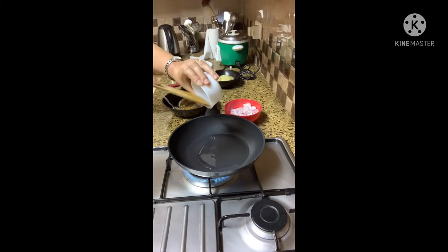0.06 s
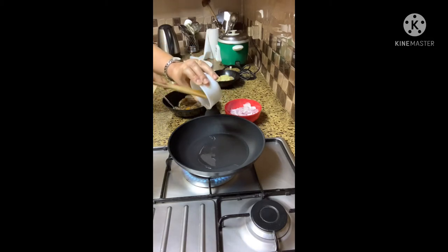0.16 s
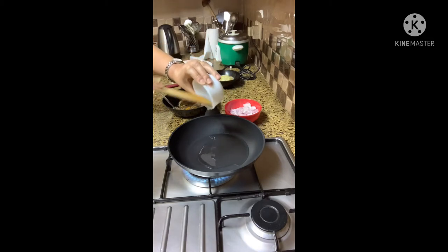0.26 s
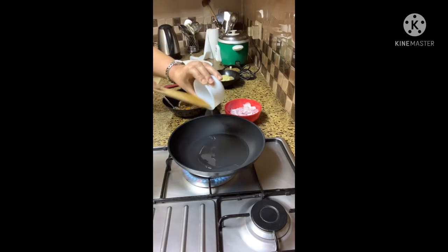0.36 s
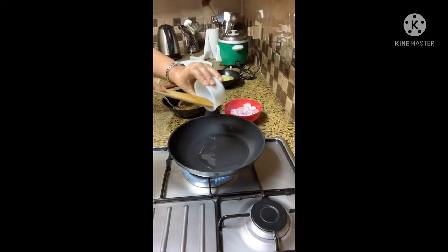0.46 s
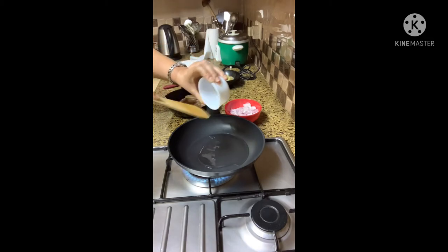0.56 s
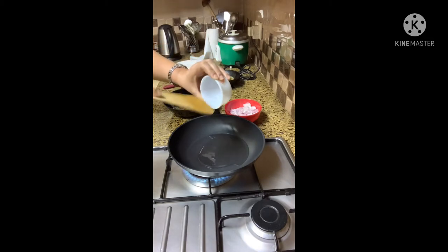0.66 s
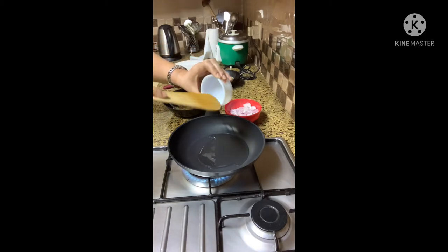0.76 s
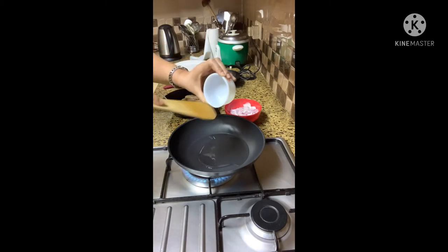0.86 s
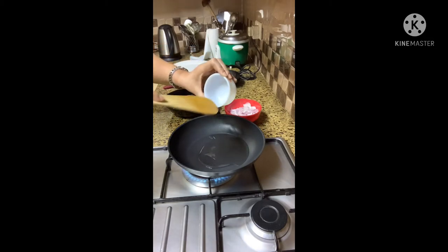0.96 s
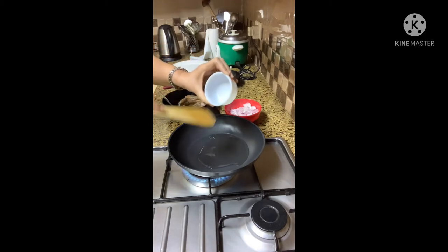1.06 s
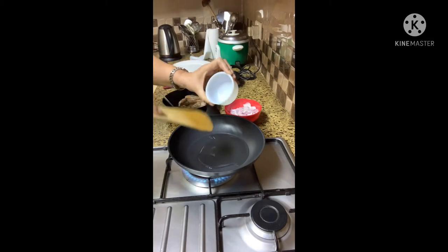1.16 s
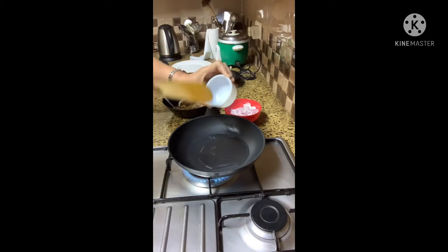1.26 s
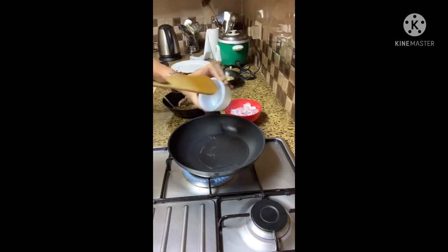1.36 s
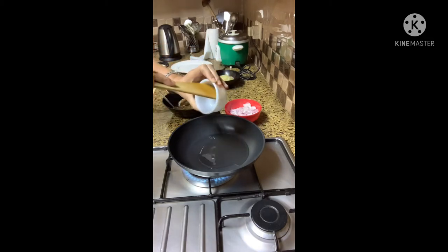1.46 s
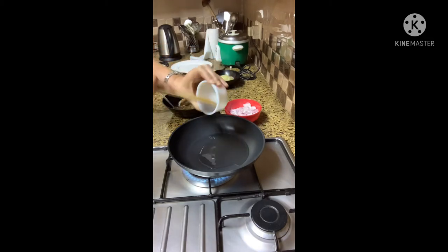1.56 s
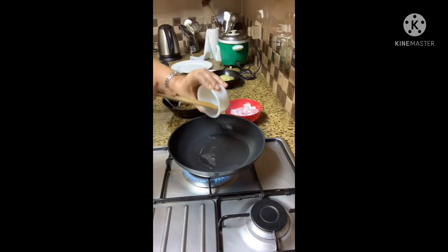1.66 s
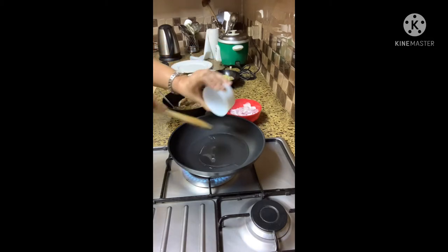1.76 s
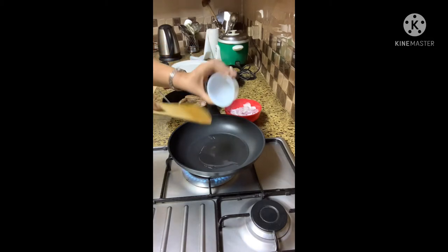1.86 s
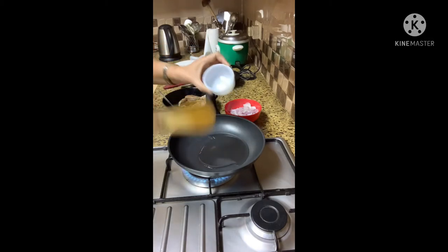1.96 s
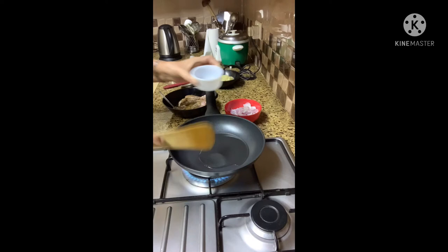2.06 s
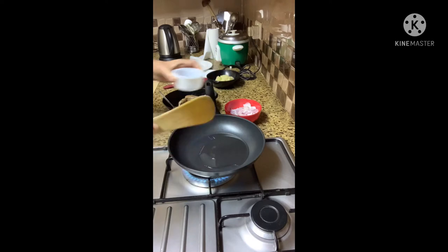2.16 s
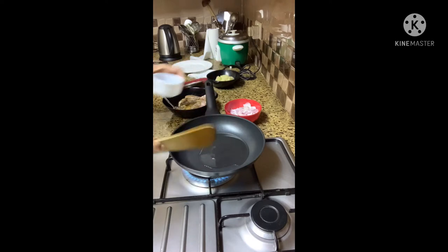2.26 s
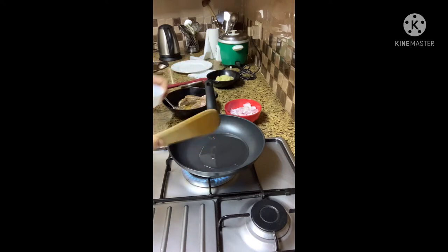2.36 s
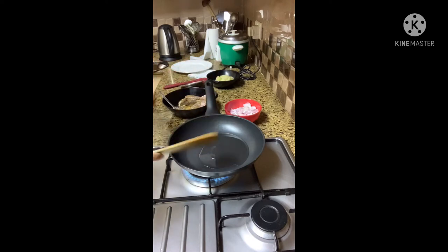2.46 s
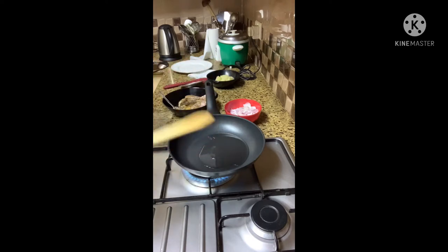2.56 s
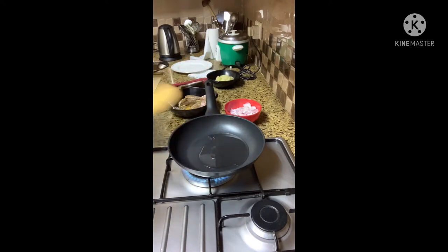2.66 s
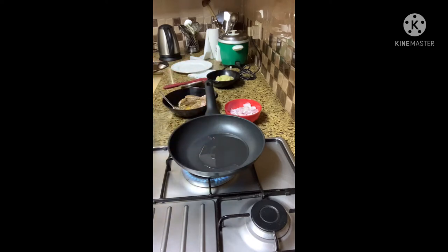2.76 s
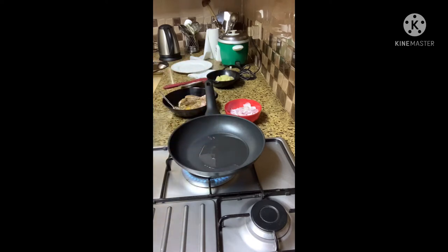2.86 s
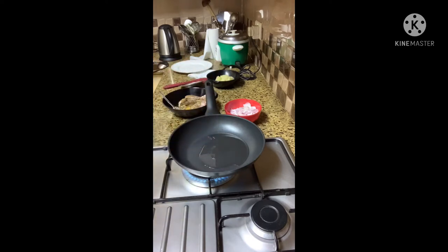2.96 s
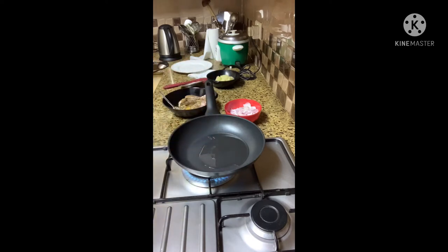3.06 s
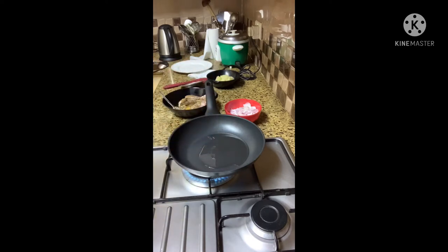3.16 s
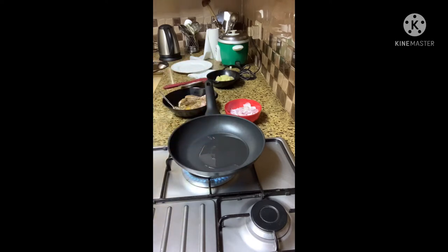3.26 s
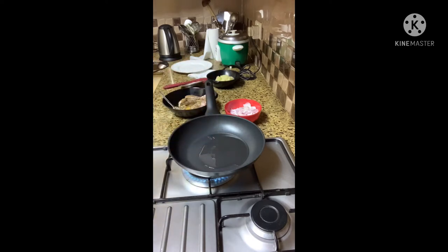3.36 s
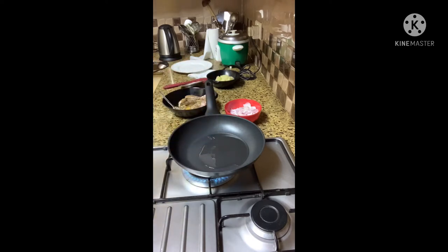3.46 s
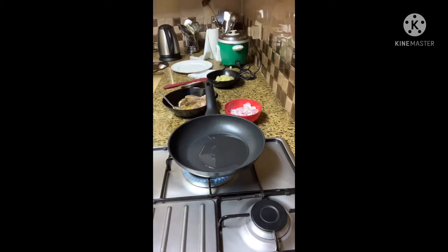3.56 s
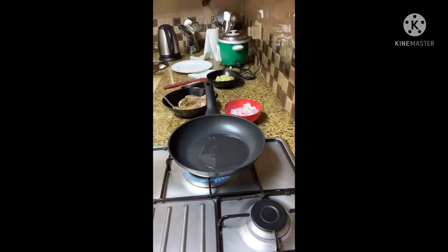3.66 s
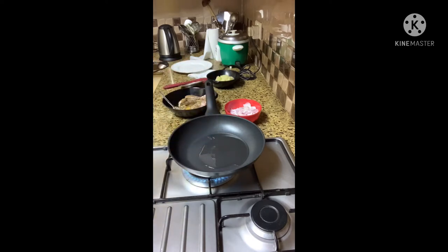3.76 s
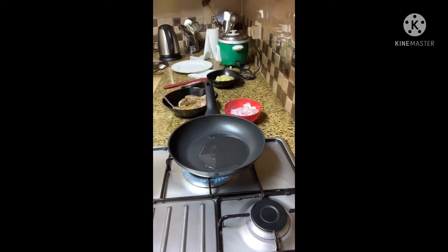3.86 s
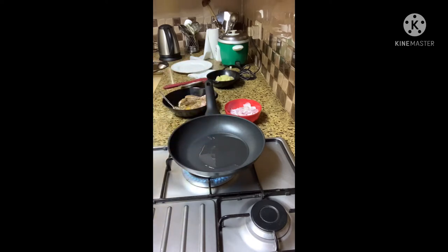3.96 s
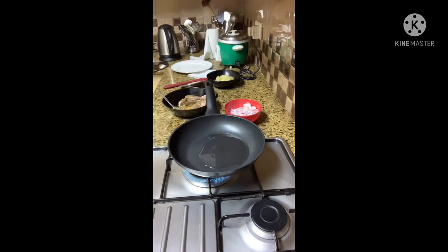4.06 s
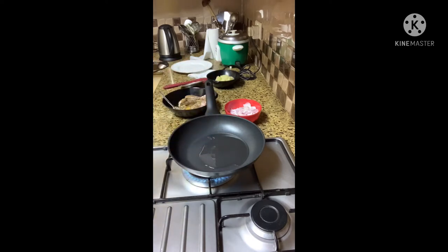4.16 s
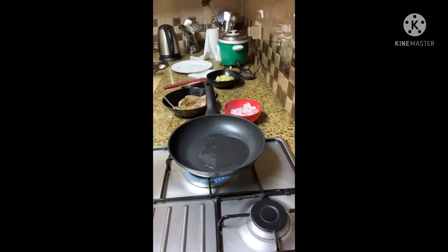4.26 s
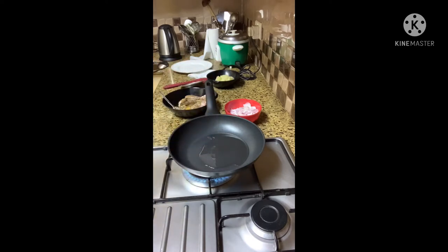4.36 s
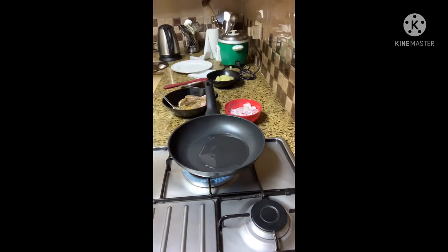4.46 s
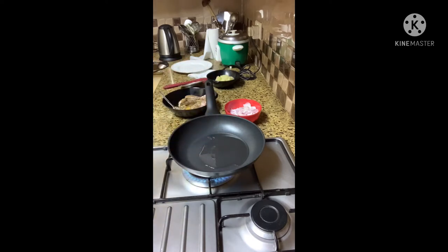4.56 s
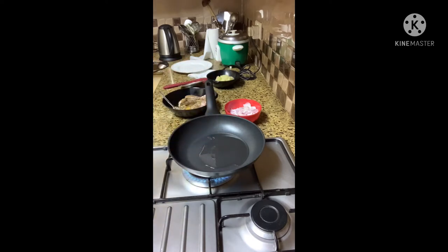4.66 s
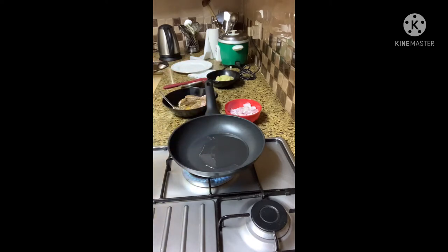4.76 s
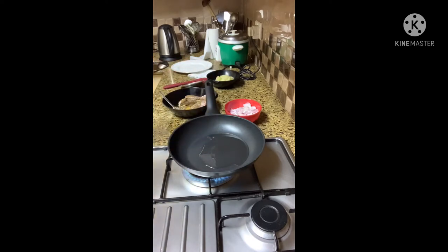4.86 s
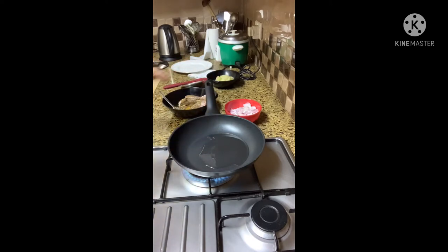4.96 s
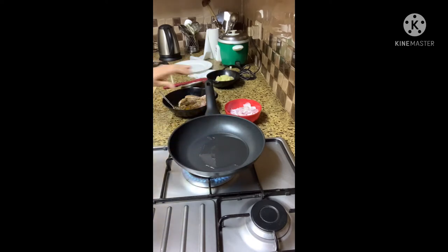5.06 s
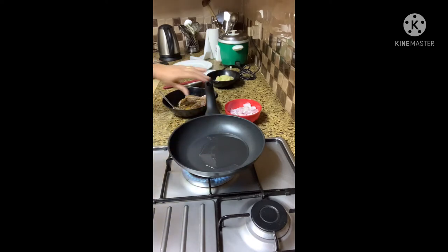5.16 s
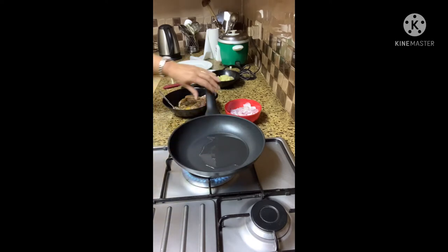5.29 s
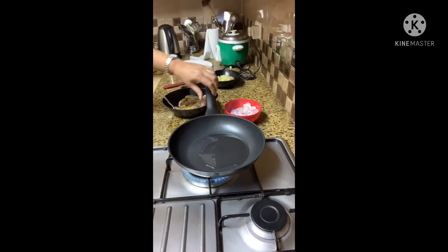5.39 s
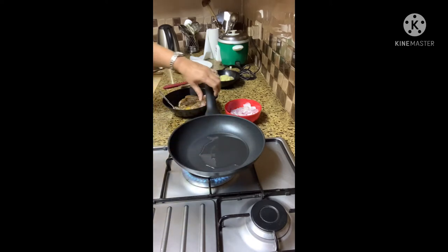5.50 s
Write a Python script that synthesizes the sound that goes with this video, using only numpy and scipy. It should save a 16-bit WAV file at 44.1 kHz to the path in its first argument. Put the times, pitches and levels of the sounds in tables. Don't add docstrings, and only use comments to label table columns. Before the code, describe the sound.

In a tiled kitchen a gas burner hisses faintly over a low mains hum. Close by, a wooden spatula taps a hand-held bowl in two clusters, with short gritty scrapes between. After soft cloth and slipper rustles, the bowl is set down farther away with a reverberant thud, then faint knocks follow. Phone microphone, limited deep bass.

```python
import sys
import numpy as np
from scipy import signal
from scipy.fft import rfft, irfft
from scipy.io import wavfile
from scipy.ndimage import uniform_filter1d

SR = 44100
rng = np.random.default_rng(int(sys.argv[2]) if len(sys.argv) > 2 else 0)


def volts(x):
    e = np.asarray(x, float) / 20
    return 10 ** e


def int16_out(signal):
    q = np.round(np.clip(np.atleast_2d(signal).T, -1, 1) * 32767)
    wavfile.write(sys.argv[1], SR, q.astype(np.int16))


N = 243873


def level(x, db):
    return x * volts(db) / np.sqrt(np.mean(x ** 2))


def band(x, hz, width):
    return signal.lfilter(*signal.iirpeak(hz, hz / width, fs=SR), x)


def walk(rate):
    k = int(SR / rate)
    steps = np.repeat(rng.standard_normal(N // k + 1), k)
    return 1.4 * uniform_filter1d(uniform_filter1d(steps, k), k)[:N]


def add(track, s, x):
    i = int(s * SR)
    track[i:i + len(x)] += x[:N - i]


def recolour(y, hz, db):
    spectrum = rfft(y)
    f = np.fft.rfftfreq(len(y), 1 / SR) + 1
    broad = np.sqrt(uniform_filter1d(np.abs(spectrum) ** 2, size=len(y) // 150))
    colour = volts(np.interp(np.log(f), np.log(hz), db))
    return irfft(spectrum / broad * colour, len(y))


def ring(modes, rise_s, scatter_db):
    t = np.arange(SR // 3) / SR
    hz, db, t60 = np.transpose(modes)[:, :, None]
    luck_db = scatter_db * rng.standard_normal((len(modes), 1))
    y = np.sum(volts(db + luck_db) * np.sin(2 * np.pi * hz * t) * 1000. ** (-t / t60), axis=0)
    y = y * (1 - np.exp(-t / rise_s)) ** 2
    return y / np.abs(y).max()


def burst(colour, t60, tilt_db):
    t = np.arange(8192) / SR
    hz, db = np.transpose(colour)
    noise = rng.standard_normal(len(t)) * 1000. ** (-t / t60)
    y = recolour(noise, hz, db + tilt_db * np.log2(hz / 1500))
    y = y * np.clip(t / 0.00038, 0, 1) * (t < .15)
    return y / np.abs(y).max()


# pitch_hz, density_db (per Hz)
HISS = [(18, -68), (30, -14.5), (64, -10), (100, -2), (170, -8.5), (311, -17.5), (394, -17.5), (449, -20),
        (740, -14.5), (1390, -26), (1670, -27), (4190, -30), (8080, -35), (13700, -33), (16000, -38.5)]
# pitch_hz, width_hz, level_db
JETS = [(140, 9.9, -63.5), (753.4, 50, -64), (601, 40, -71), (399, 30, -74), (4140, 70, -88.5),
        (9570, 150, -74), (10500, 80, -88), (11580, 130, -75.5), (13300, 200, -80.5), (14200, 90, -76)]
# pitch_hz, level_db
HUM = [(50, -71), (100, -56.5), (199, -75)]


def burner():
    f = np.fft.rfftfreq(N, 1 / SR) + 1
    t = np.arange(N) / SR
    hz, db = np.transpose(HISS)
    colour = volts(np.interp(np.log(f), np.log(hz), db))
    scale = np.sqrt(np.sum(colour[f > 1000] ** 2) * 2 / N)
    hiss_db = -62.5 + 0.32 * walk(0.86)
    out = 0
    for centre in 30 * 2 ** np.arange(0, 9.6, .5):
        share = np.cos(np.pi * np.clip(np.log2(f / centre), -.5, .5))
        noise = irfft(rfft(rng.standard_normal(N)) * colour * share, N)
        flicker_db = 1.9 * walk(10) / (1 + centre / 2500.)
        out = out + noise * volts(hiss_db + flicker_db) / scale
    for hz, width, db in JETS:
        whistle = band(band(rng.standard_normal(N), hz, width), hz, width)
        out = out + level(whistle, db) * volts(0.61 * walk(4.7))
    for hz, db in HUM:
        out = out + volts(db - 0.5 + 1.5 * walk(9.3)) * np.sin(2 * np.pi * hz * t + .8 * walk(9.7))
    return out


# start_s, length_s, level_db, centre_hz
SCUFFS = [
    (0, 0.1, -61, 4970),
    (1.09, 0.03, -52, 9000),
    (1.995, 0.16, -58, 2940),
    (4.899, 0.038, -57.5, 10800),
    (5.27, 0.22, -64.5, 2000),
    (5.46, 0.13, -53, 2380),
]
# start_s, length_s, level_db, grit (0-1)
SCRAPES = [
    (.56, 0.082, -57.5, .4),
    (0.801, 0.17, -58.5, .9),
    (1.55, 0.099, -57.5, .5),
    (1.71, 0.13, -60, 0.5),
]
# start_s, length_s, level_db, centre_hz
SWEEPS = [
    (2.9, 0.78, -59, 4000),
    (4.16, 0.53, -57.5, 3050),
    (4.698, 0.25, -58.5, 1850),
]
# pitch_hz, width_hz, level_db
SINGING = [(2570, 150, 10.5), (4750, 67, 16), (6070, 200, 8.5), (8100, 300, 4), (9850, 400, 5.5)]


def swishes():
    out = np.zeros(N)
    stutter_db = 2.5 * walk(300)
    strokes = [(s, length, db, 10000, 0.54, grit) for s, length, db, grit in SCRAPES]
    strokes += [(*row, 0.23, 0.04) for row in SCUFFS]
    strokes += [(*row, 0.61, 0.015) for row in SWEEPS]
    t = np.arange(SR) / SR
    for s, length, db, hz, rise, grit in strokes:
        swell = np.sin(np.pi / 2 * np.interp(t / length, [0, rise, 1], [0, 1, 0])) ** 2
        rub = level(band(rng.standard_normal(SR), hz, 1.7 * hz), db)
        rub = rub * volts(grit * np.roll(stutter_db, -int(s * SR))[:SR])
        song = sum(volts(lift_db) * band(rub, f, width) for f, width, lift_db in SINGING)
        add(out, s, swell * (rub + grit * song))
    return out


# start_s, level_db, direct_db (direct share), tilt_db (per octave), ring_db (bowl)
SET_DOWN = [
    (0.001, -46, -4, 2, -10),
    (2.022, -45, 0, 3, -25),
    (3.911, -46, -1, 8, 8),
    (3.920, -20.5, 5.5, 6.5, -4.5),
    (3.925, -20, 5.5, 1, -5.5),
    (4.737, -37, -5.5, 0, -25),
    (4.775, -43.5, -12, 0, -30),
    (5.283, -45.5, -9, 4.5, -28.5),
]
# pitch_hz, density_db (per Hz)
WORKTOP = [(80, -18), (200, -8), (500, -3), (1000, -1.5), (1550, 6.5), (2100, -9.5), (3200, -8),
           (5000, -23.5), (7400, -44.5), (9500, -44), (16000, -61)]
# pitch_hz, level_db, t60_s
STANDING = [(1330, -28, 0.042), (1455, 0, 0.053), (1580, -26, 0.034), (1700, -8.5, 0.024),
            (2546, -0.5, 0.17), (2567, -5.5, 0.085), (11460, -8.5, 0.023), (11000, -31, 0.036)]
# start_s, level_db, pitch_hz, t60_s
THUMPS = [
    (1.096, -45.5, 388, 0.07),
    (1.654, -37, 391, 0.063),
    (3.923, -36.5, 191, 0.3),
    (3.925, -37.5, 126, 0.31),
    (4.745, -55, 400, 0.13),
    (5.35, -44, 190.6, 0.16),
    (6.4, -49, 221, .1),
    (7.9, -34, 181, 0.15),
    (5.46, -44.5, 140, 0.19),
]


def worktop():
    direct, fed = np.zeros(N), np.zeros(N)
    for s, db, direct_db, tilt_db, ring_db in SET_DOWN:
        thud = volts(db) * burst(WORKTOP, .035, tilt_db)
        bowl_ring = volts(db + ring_db) * ring(STANDING, 0.00033, 1.5)
        for knock in (thud, bowl_ring):
            add(direct, s, volts(direct_db) * knock)
            add(fed, s, knock)
    for s, db, hz, t60 in THUMPS:
        add(direct, s, volts(db) * ring([(hz, 0, t60), (1.13 * hz, -6, t60)], .003, 0))
    return direct, fed


# pitch_hz, t60_s, level_db
ROOM = [(152.2, .35, 0.5), (400, 0.28, 2.5), (814, 0.2, 0.5), (1417, 0.4, 0), (2570, 0.45, -2.5),
        (4000, .39, 0.5), (6480, .36, 1.5), (11920, .2, -0.5)]


def room(x):
    t = np.arange(SR // 2) / SR
    hz, t60, db = np.transpose(ROOM)
    tail = sum(band(rng.standard_normal(len(t)), f, 0.63 * f) * 1000. ** (-t / d) for f, d in zip(hz, t60))
    gap_s = 0.0026
    onset = np.clip(t / gap_s - 1, 0, 1)
    tail = recolour(tail * onset, hz, db) * onset * (t < .45)
    return signal.fftconvolve(x, tail / np.sqrt(np.sum(tail ** 2)))[:N]


# start_s, level_db (wall peak), rim_db and upper_db (relative to the wall), wall_hz
TAPS = [
    (0.2509, -16, -20, -8.5, 1377),
    (0.4545, -36.5, -21, -19, 1420),
    (0.5448, -23.5, -15, -16.5, 1345),
    (1.0924, -44, -0.5, -5, 1436),
    (1.4475, -35, -15, -17, 1427),
    (1.4775, -36.5, -8, -29, 1465),
    (1.5208, -18.5, -9.5, -18.5, 1476),
    (1.6369, -14.5, 4.5, -4.5, 1412),
    (1.6525, -25, -27, -16.5, 1297),
]
# ratio (to wall tone), level_db, t60_s
WALL = [(.7, -7.5, 0.023), (.86, -7.5, 0.037), (1.001, -1.5, 0.045), (1.06, -10, 0.044),
        (1.22, -15.5, 0.029)]
# pitch_hz, level_db, t60_s
RIM = [(2376, -10, 0.05), (2573, -3.5, .075), (2660, -13.5, .05), (2850, -12, .04), (6057, -23.5, .05),
       (6000, -27.5, .04), (10600, -33.5, .04)]
# pitch_hz, level_db, t60_s
UPPER = [(3488, -3, 0.04), (4090, -7.5, .02), (5060, -7.5, 0.017), (6870, -19, 0.025)]
# pitch_hz, level_db, t60_s
KNOCK = [(391, -2, 0.063), (553, 1.5, .05), (752, 2.5, 0.031)]
# pitch_hz, density_db (per Hz)
CRACK = [(300, -14.5), (1000, -7), (2000, -3.5), (3500, -4.5), (5500, -10.5), (7500, -14.5), (10000, -22),
         (16000, -38)]


def bowl():
    rings, cracks = np.zeros(N), np.zeros(N)
    t = np.arange(SR // 3) / SR
    grip = volts(-14.5 * np.clip((t - 0.0081) / 0.0057, 0, 1))
    for s, db, rim_db, upper_db, hz in TAPS:
        wall = ring([(ratio * hz, d, t60) for ratio, d, t60 in WALL], 0.0013, 1.2)
        rim = volts(rim_db) * ring(RIM, .0013, 1.2)
        upper = volts(upper_db - 3) * ring(UPPER, 0.00039, 2.5)
        knock = volts(-30 + 0.28 * db) * ring(KNOCK, .0015, 3.4)
        add(rings, s - .0012, volts(db + 3.5) * (wall + rim + upper) * grip + knock)
        crack_db = db - 4.5 + 0.46 * upper_db
        add(cracks, s - .0005, volts(crack_db) * burst(CRACK, 0.052, tilt_db=-2.0))
    return rings, cracks


# start_s, level_db, centre_hz
TICKS = [
    (1.091, -39, 9000),
    (1.521, -42.5, 10940),
    (1.635, -34, 8970),
    (2.092, -52, 11000),
    (3.919, -50, 10900),
    (4.9, -41, 11000),
]


def ticks():
    out = np.zeros(N)
    t = np.arange(800) / SR
    for s, db, hz in TICKS:
        noise = rng.standard_normal(len(t)) * np.exp(-t / .0015)
        add(out, s, volts(db) * band(noise, hz, 1.8 * hz))
    return out


def scene():
    steady = burner() + swishes()
    direct, fed = worktop()
    rings, cracks = bowl()
    near = rings + cracks + ticks()
    near_fed = near + volts(4.5) * cracks
    wet = room(volts(-9) * near_fed + volts(4.5) * fed)
    return (near + direct + wet + steady)[None]


def band_limit(x):
    return signal.sosfilt(signal.butter(12, 16500, fs=SR, output="sos"), x)


def record(dry):
    x = signal.sosfilt(signal.butter(6, 42, "high", fs=SR, output="sos"), dry)
    x = signal.sosfilt(signal.ellip(10, .2, 70, 16000, fs=SR, output="sos"), x)
    return band_limit(x)


dry = scene()
out = record(dry)
int16_out(out)
```